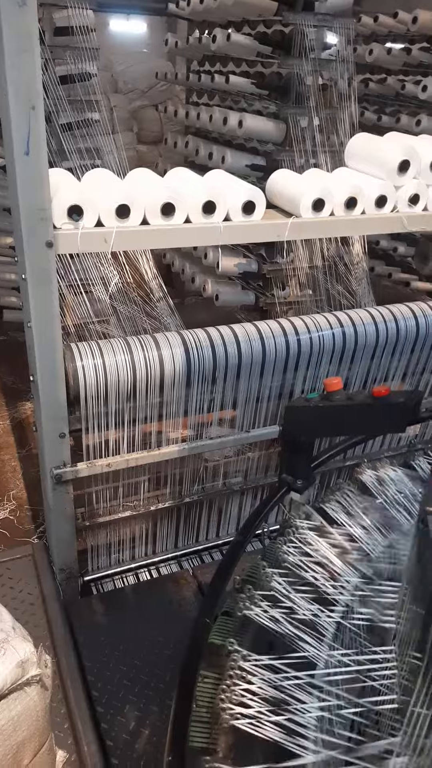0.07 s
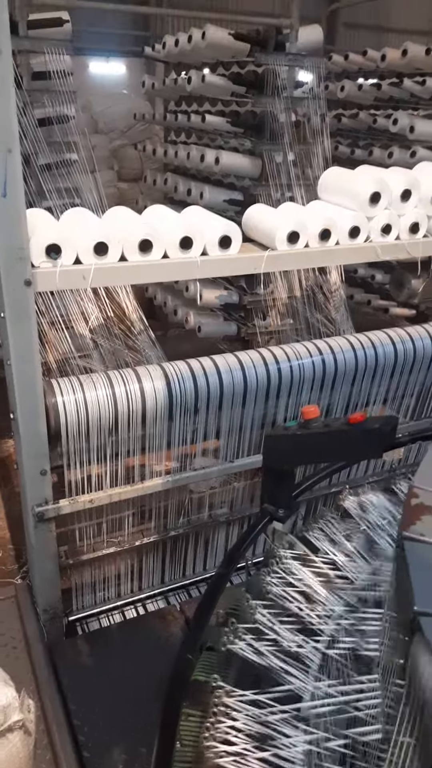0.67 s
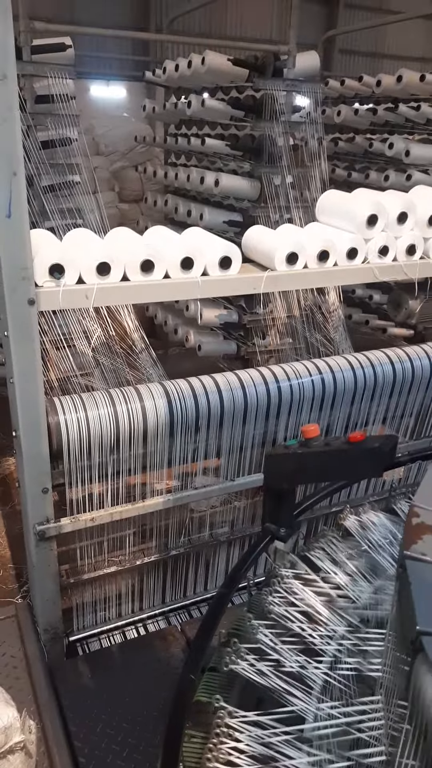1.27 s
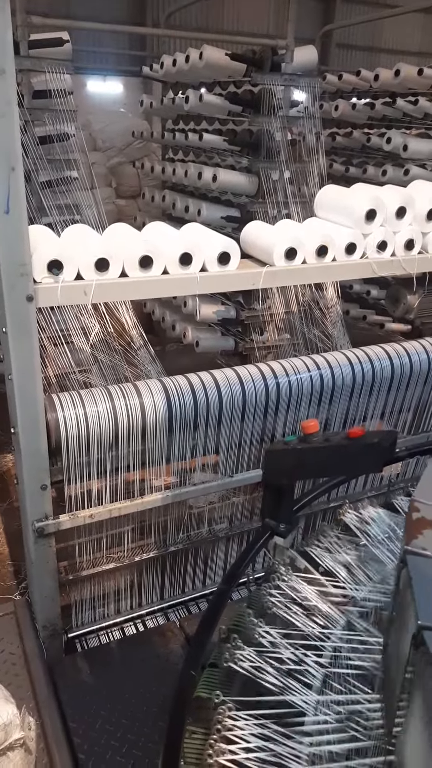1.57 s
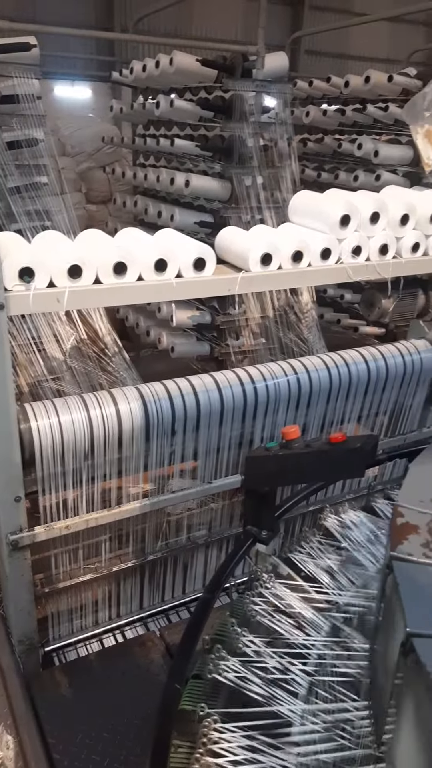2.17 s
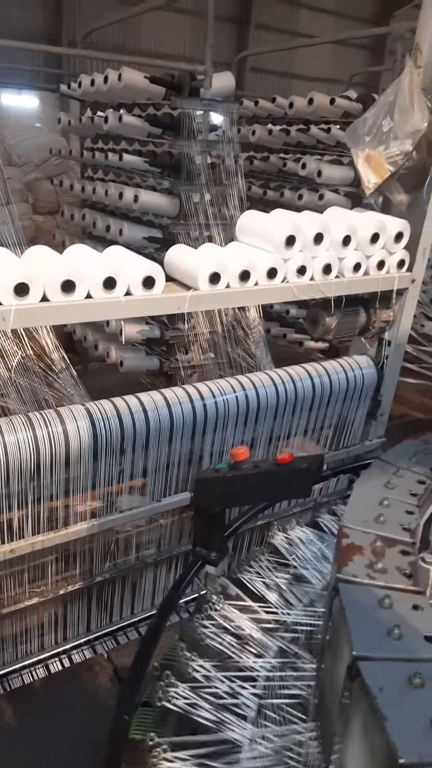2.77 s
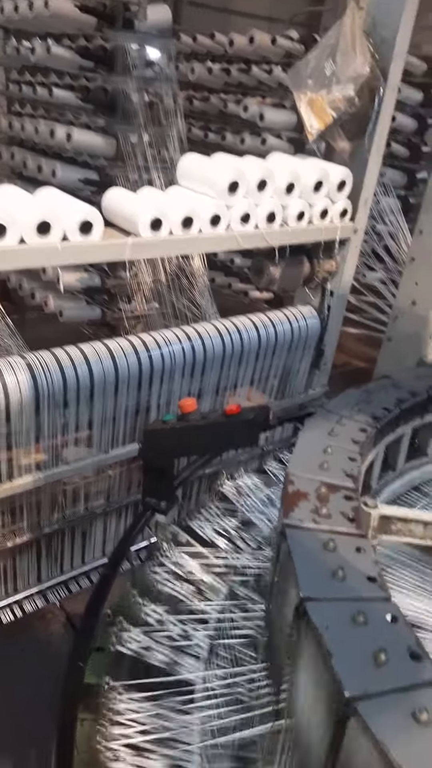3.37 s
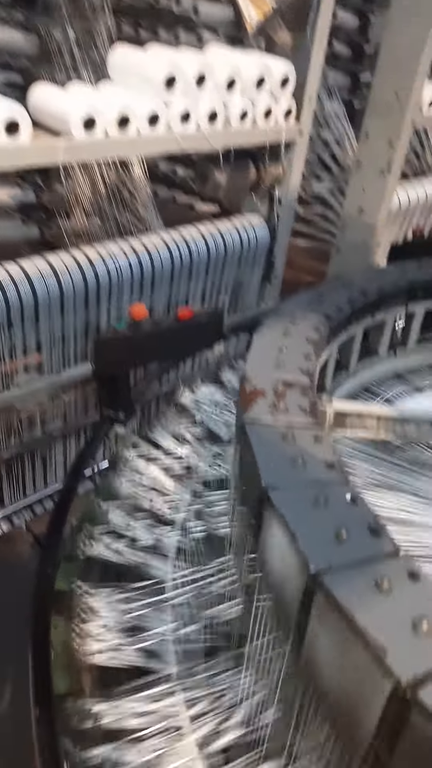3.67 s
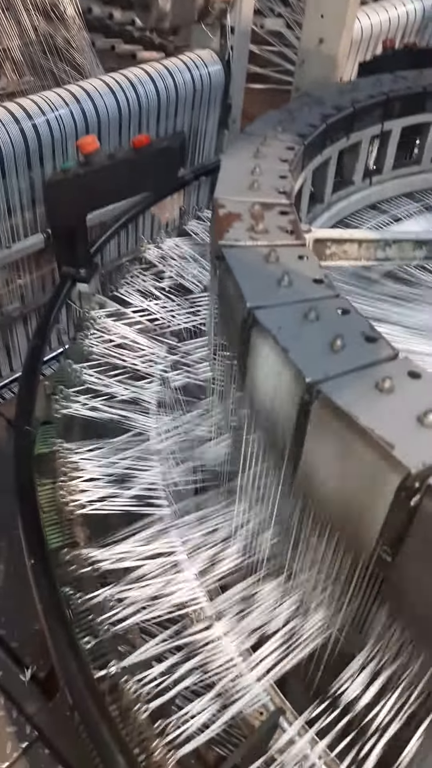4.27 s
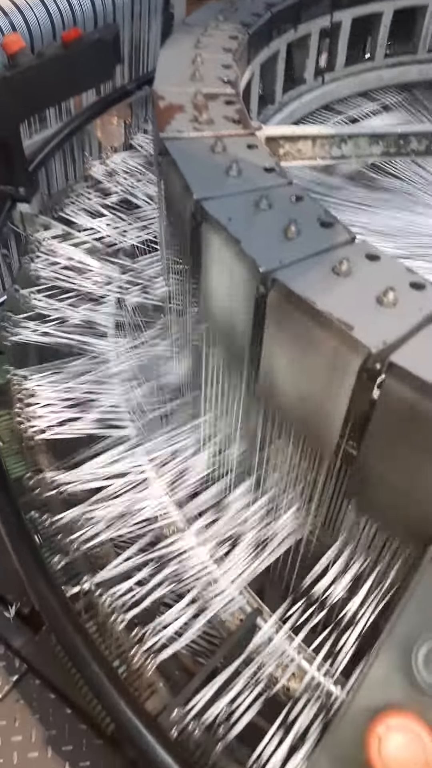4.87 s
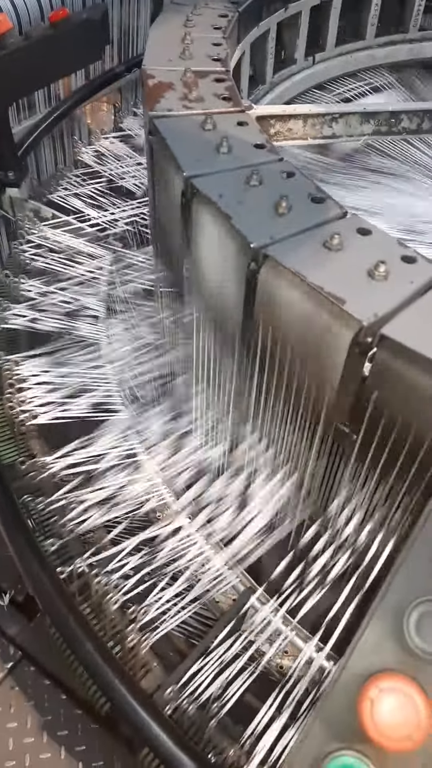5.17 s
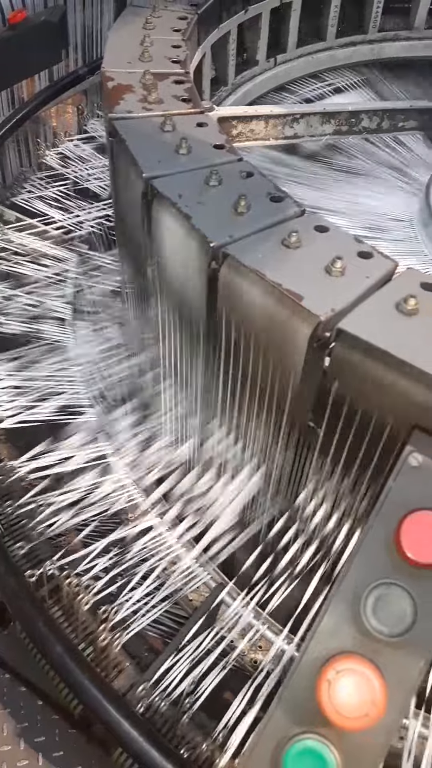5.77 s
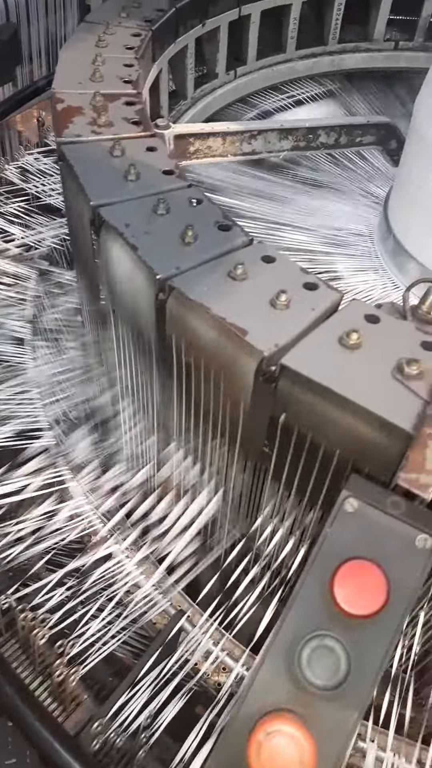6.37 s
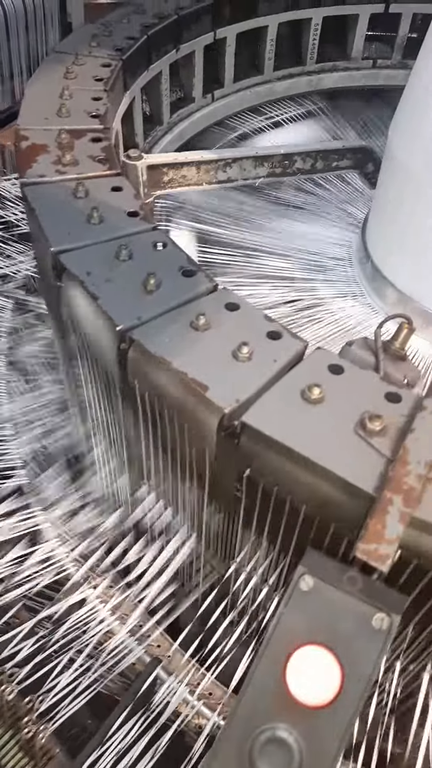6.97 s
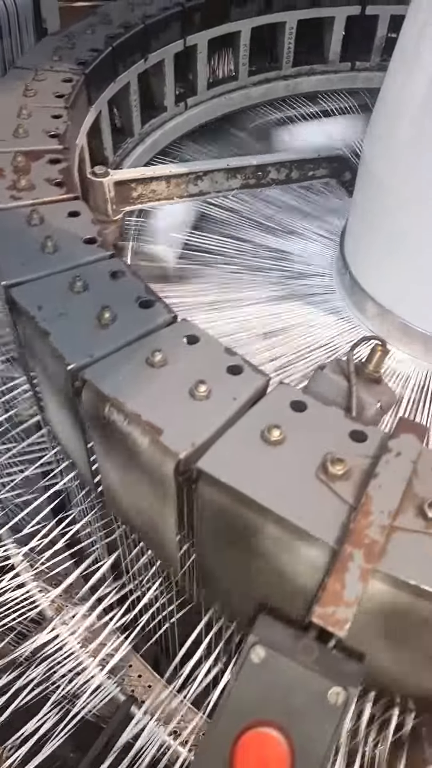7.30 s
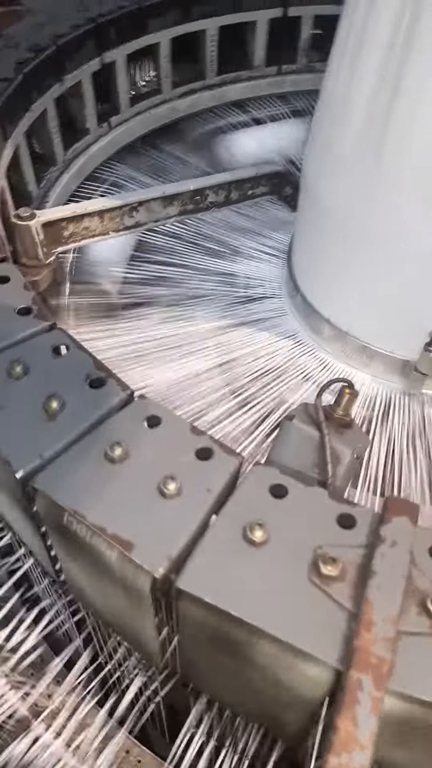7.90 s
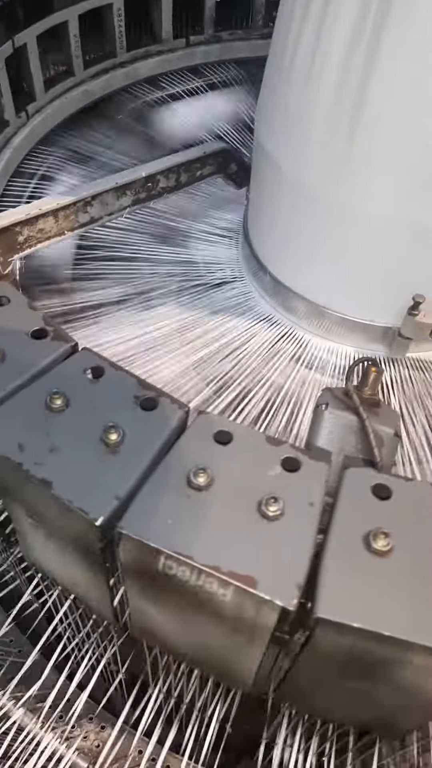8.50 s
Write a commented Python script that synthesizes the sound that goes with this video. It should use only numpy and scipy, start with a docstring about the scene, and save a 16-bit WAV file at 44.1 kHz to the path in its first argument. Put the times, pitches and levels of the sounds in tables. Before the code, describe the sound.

A circular loom runs close by from start to finish, about eight and a half seconds, at a steady, loud level. Hundreds of steel thread guides rattle so fast that they blur into a ringing roar. Through it, the shuttle wheels hold a high, rough whine that flutters and throbs with each turn. Plastic tapes add a bright, lightly pulsing hiss, and the frame gives a softer low hum and rumble. Other looms whine farther off at slightly different pitches in the hall's echo. Between about 3 and 5 seconds the microphone moves along the ring, and the whine and hiss shift slightly left. At about 3.8 seconds a wheel starts a short, high, rough squeak, repeating every 0.6 seconds. It is clearest around 4.4 seconds, then continues more faintly within the roar until the end.

```python
"""A circular loom in a weaving hall

Six shuttles race round a ring, their wheels whining over its thin bars; partway through, one
starts to squeak once a turn. A cam shakes the frame and throws the heddles (the steel thread
guides), which rattle while plastic tapes rustle. Much of this comes back with every turn.
The listener moves slowly along the ring, and other looms whine farther off."""
import sys
import numpy as np
from scipy import signal
from scipy.fft import rfft, irfft, next_fast_len
from scipy.io import wavfile
from scipy.ndimage import uniform_filter1d, minimum_filter1d, map_coordinates

SR = 44100
rng = np.random.default_rng(int(sys.argv[2]) if len(sys.argv) > 2 else 0)


def master_out(mix):
    """Clip the mix to full scale and print it as 16-bit PCM to the path in sys.argv[1]."""
    frames = np.transpose(np.atleast_2d(mix))
    ceiling = np.clip(frames, -1, 1)
    pcm = np.round(ceiling * 32767).astype(np.int16)
    wavfile.write(sys.argv[1], SR, pcm)


N = 376613

# How long the hall's echo takes to fade by 60 dB: pitch_hz, fade_s
HALL_ECHO = [(200, 4.4), (2000, 0.71), (10000, 0.33)]
# The whines of the other looms: pitch_hz, level_db, octave_level_db
FAR_LOOMS = [(1161, -25.5, -39), (1294, -28, -43.5), (905, -35, -58), (852, -39, -54)]
# The tones the cam shakes out of the frame: cycles_per_turn, level_db
FRAME_HUM = [ (36, -61), (54, -53), (57, -46), (63, -44), (69, -53), (72, -50), (81, -50), (96, -45),
             (99, -42), (108, -44), (114, -50), (127, -51), (144, -49), (159, -51), (174, -51), (184, -48),
             (216, -52), (243, -52)]
# The tone colour of the rumbling frame and floor: pitch_hz, relative_level_db
RUMBLE_COLOUR = [(15, -64), (25, -55), (59, -18), (91, -7), (129, -5.5), (161, -3), (232, -6.5), (293, -2),
                 (330, -4), (476, -4), (686, -6), (830, -6), (1080, -24), (1830, -120)]
# How alike the rumble is left and right (1 or more is the same, -1 opposite): pitch_hz, likeness
RUMBLE_LIKENESS = [(25, -1), (70, .92), (150, 1), (220, 1), (330, 0.9), (480, .6), (720, .5), (1000, 1.5)]
# How far the frame's sound on the left runs ahead of the right: pitch_hz, lead_radians
FRAME_LEFT_LEAD = [(40, .6), (120, 0.46), (260, 0.6), (330, .15), (900, .2)]
# How much louder the frame is on the left: pitch_hz, left_minus_right_db
FRAME_BALANCE = [(30, 1.5), (100, 3.5), (200, 0), (285, -3), (400, -1), (650, 1.5)]
# The tone colour of the tape rustle as heard, with the microphone's notch near 8.6 kHz:
# pitch_hz, relative_level_db
HEARD_RUSTLE = [(1850, -21.5), (3150, -2.5), (3260, -5), (3460, -5.5), (4070, -2), (5120, -1.5),
                (6890, -4.5), (7570, -9.5), (8610, -29.5), (9650, -19.5), (11700, -16.5), (15100, -21.5),
                (15800, -29.5)]
# Where the heddles, levers and ring resonate: pitch_hz, rough_half_width_hz, relative_level_db
STEEL_RESONANCES = [(989, 59, -2.5), (1063, 51, -10), (1170, 63, 0), (1314, 157, -5), (1562, 125, -9.5),
                    (1756, 170, -11), (1998, 103, -2.5), (2277, 275, -9), (2640, 500, -13.5),
                    (3030, 170, -14)]
# The listener's path (0 is beside the tape feed, 1 over the middle of the ring): time_s, place
LISTENER_PATH = [(3.0, 0.18), (5.0, 0.56), (8.5, 0.67)]

TURN_HZ, RING_BARS = 1.673, 614  # turns a second; bars a wheel crosses in one turn
# Each pair is (beside the feed, over the ring). SIDE means left minus right.
WHINE_DB, WHINE_SIDE_DB = (-19, -18), (0.5, 2.8)
OCTAVE_DB, OCTAVE_SIDE_DB = (-23, -23.5), (-5, -1.4)
CLATTER_DB, RUMBLE_DB = (-15, -16), (-27, -25.8)
RUSTLE_DB, FINE_RUSTLE_DB, RUSTLE_SIDE_DB = (-20, -20), (-33.9, -33), (-2, 0.8)


def amp(db):
    """Turn decibels into a gain to multiply by."""
    return 10 ** (np.asarray(db) / 20)


def unit(x):
    """Scale a signal to an average (rms) level of 1."""
    return x / np.sqrt(np.mean(x ** 2) + 1e-20)


def look_up(table, hz):
    """Read a table at any pitch, sliding between its rows."""
    pitches, values = np.transpose(table)
    return np.interp(np.log(hz + 1), np.log(pitches + 1), values)


def clock():
    """The time of each sample in seconds."""
    return np.arange(N) / SR


def on_path(pair):
    """Slide between two values as the listener moves."""
    times, places = np.transpose(LISTENER_PATH)
    return pair[0] + (pair[1] - pair[0]) * np.interp(clock(), times, places)


def pan(db):
    """Left and right gains that make the left louder by db."""
    return amp(np.array([db, -db]) / 2).reshape(2, -1)


def filtered(x, response):
    """Multiply each frequency in x by response(hz)."""
    size = next_fast_len(N + SR // 2)
    return irfft(rfft(x, size) * response(np.fft.rfftfreq(size, 1 / SR)), size)[..., :N]


def wobble(rate):
    """A smooth random curve through rate new values a second."""
    coarse = np.arange(0, N, 128)
    values = rng.standard_normal(int(N * rate / SR) + 4)
    return np.interp(np.arange(N), coarse, map_coordinates(values, [coarse * rate / SR]))


def swell(count, crest_s, depth_db):
    """A level in dB that rises and falls count times a turn."""
    return depth_db * np.cos(2 * np.pi * count * TURN_HZ * (clock() - crest_s))


def recurring(noise, share):
    """Make a share of the noise's power repeat every turn; the rest stays new."""
    one_turn = round(SR / TURN_HZ)
    loop = noise[:, ::-1][:, np.arange(N) % one_turn]
    return np.sqrt(share) * loop + np.sqrt(1 - share) * noise


def ticks(rate, spread_db):
    """Tiny knocks of uneven size, about rate a second on each side."""
    struck = rng.random((2, N)) < rate / SR
    return unit(struck * rng.standard_normal((2, N)) * amp(spread_db * rng.standard_normal((2, N))))


def ring_bumps(rate):
    """Random bumps on the ring, about rate a second, met again in every turn."""
    heights = rng.standard_normal(max(3, round(rate / TURN_HZ)))
    one_turn = signal.resample(heights - heights.mean(), round(SR / TURN_HZ))
    return np.resize(unit(one_turn), N)


def wheel_slip(rate, repeat_share=0.35):
    """A wheel slips partly at the same spots in each turn, partly by chance."""
    return np.sqrt(repeat_share) * ring_bumps(rate) + np.sqrt(1 - repeat_share) * wobble(rate)


def wheel_bounce(depth_db, rate):
    """A jumpy gain: bouncing wheels break their tone into short chirps."""
    return unit(amp(depth_db * np.tanh(wobble(rate))))


def hall(x):
    """The hall's echo alone, in which low notes last longest."""
    hz, t, spectrum = signal.stft(rng.standard_normal((2, SR)), SR, nperseg=256)
    fade = amp(-60 * t / look_up(HALL_ECHO, hz)[:, None])
    echo = signal.istft(spectrum * fade, SR, nperseg=256)[1]
    running = np.pad(np.atleast_2d(x), ((0, 0), (SR, 0)), mode="wrap")  # echoing from the start
    return unit(signal.fftconvolve(running, echo, axes=1)[:, SR:SR + N])


def echoing_wheels(hz, radius_m, slip, count=6):
    """Wheels drum a tone on the bars, heard as echo; its pitch swings as they come and go."""
    t = clock()
    tone = np.zeros(N)
    for shuttle in range(count):
        angle = 2 * np.pi * (TURN_HZ * t + shuttle / count)
        delay_s = radius_m * np.cos(angle) / 343  # sound travels 343 metres a second
        tone += np.sin(2 * np.pi * (hz * (t - delay_s) + rng.random()) + slip * wheel_slip(7))
    return hall(tone)


def far_looms():
    """Other looms whine, each at its own pitch, heard only through the hall's echo."""
    out = np.zeros((2, N))
    for hz, db, octave_db in FAR_LOOMS:
        out += amp(db) * echoing_wheels(hz, radius_m=0.42, slip=1.99, count=3)
        out += amp(octave_db) * echoing_wheels(2 * hz, radius_m=0.466, slip=1.7, count=2)
    return out * pan(1.3)


def frame(boom_hz=162, boom_width_hz=27, boom_db=-12.5):
    """The cam shakes the frame: a hum, a rumble and a boom where the frame resonates most."""
    angle = 2 * np.pi * TURN_HZ * clock() + 0.0029 * wobble(1.24)
    hum = sum(amp(db) * np.sqrt(2) * np.sin(cycles * angle + 2 * np.pi * rng.random())
              for cycles, db in FRAME_HUM)
    shake = recurring(rng.standard_normal((2, N)), share=0.23)
    spread = lambda hz: np.arccos(np.clip(look_up(RUMBLE_LIKENESS, hz), -1, 1)) / 2
    colour = lambda hz: amp(look_up(RUMBLE_COLOUR, hz)) * [np.cos(spread(hz)), np.sin(spread(hz))]
    middle, side = filtered(shake, colour)
    rumble = unit(np.array([middle + side, middle - side]))
    push = recurring(rng.standard_normal((1, N)), share=0.52)
    boom = unit(filtered(push, lambda hz: 1 / (1 + (2 * (hz - boom_hz) / boom_width_hz) ** 2)))
    sound = amp(on_path(RUMBLE_DB)) * (rumble + amp(boom_db) * boom) + hum
    left_lead = lambda hz: np.exp(0.5j * np.outer([1, -1], look_up(FRAME_LEFT_LEAD, hz)))
    return filtered(sound, lambda hz: pan(look_up(FRAME_BALANCE, hz)) * left_lead(hz))


def tapes(fine_above_hz=8600):
    """Plastic tapes rub and flick, swelling with the turn and as each shuttle parts them."""
    swell_db = (swell(count=1, crest_s=0.076, depth_db=0.5)
                + swell(count=2, crest_s=0.157, depth_db=0.5)
                + swell(count=6, crest_s=0.098, depth_db=0.84))
    rubbing = unit(ticks(rate=5000, spread_db=1.5) + 1.6 * rng.standard_normal((2, N)))
    rustle = filtered(rubbing, lambda hz: amp(look_up(HEARD_RUSTLE, hz)))
    fine = filtered(rustle, lambda hz: hz > fine_above_hz)
    body_db = on_path(RUSTLE_DB) + 0.22 * swell_db + 0.45 * wobble(28)
    body = unit(rustle - fine) * amp(body_db) * pan(on_path(RUSTLE_SIDE_DB))
    flicker_db = 0.6 * np.array([wobble(22), wobble(22)])
    return body + unit(fine) * amp(on_path(FINE_RUSTLE_DB) + swell_db + flicker_db)


def heddles():
    """Hundreds of steel thread guides and levers rattle, blurring into a ringing roar."""
    rattle = unit(ticks(rate=5000, spread_db=1.6) + 1.17 * rng.standard_normal((2, N)))
    blows = recurring(rattle, share=0.079)
    steel = lambda hz: np.sqrt(sum(amp(2 * db) / (1 + ((hz - pitch) / (0.97 * width)) ** 2) ** 2
                                   for pitch, width, db in STEEL_RESONANCES))
    return amp(on_path(CLATTER_DB)) * pan(-0.6) * unit(filtered(blows, steel))


def squeaks(first_s=3.793, closest_s=4.4, pitch_hz=3010, fall_hz_per_s=700):
    """One wheel skids at the same spot each turn: a short, rough chirp that sags in pitch."""
    out = np.zeros((2, N))
    for peak_s in np.arange(first_s, N / SR, 1 / TURN_HZ):
        db = -24 + 4.5 * np.exp(-((peak_s - closest_s) / 0.4) ** 2)  # loudest as the listener passes
        sounding = np.abs(clock() - peak_s) < 0.06
        t = clock()[sounding] - peak_s
        phase = 2 * np.pi * (pitch_hz * t - fall_hz_per_s * t ** 2 / 2)
        roughness = np.array([wobble(170)[sounding] for side in range(2)])
        loudness = amp(db) * np.exp(-(t / 0.023) ** 2)
        out[:, sounding] += loudness * np.sqrt(2) * np.sin(phase + 1.9 * roughness)
    return out


def nearest_wheel(hz, swing_hz, slip, count=6):
    """The tone that comes straight from the shuttles; its pitch sags as each goes by."""
    passing = 2 * np.pi * count * TURN_HZ * clock()
    phase = 2 * np.pi * hz * clock() - swing_hz / (count * TURN_HZ) * np.cos(passing)
    return unit(np.array([np.sin(phase + slip * wheel_slip(9)) for side in range(2)]))


def shuttles(third_db=-10.5):
    """The near loom's wheels whine over the bars: three tones that throb alike in every turn."""
    throb_db = (swell(count=3, crest_s=0.026, depth_db=1.0)
                + swell(count=6, crest_s=0.043, depth_db=0.6) + 0.5 * ring_bumps(rate=60))
    high_throb_db = (swell(count=1, crest_s=0.14, depth_db=0.6)
                     + swell(count=5, crest_s=0.11, depth_db=1.7) + 0.6 * ring_bumps(rate=50))
    bar_hz = RING_BARS * TURN_HZ
    # Slipping blurs the higher tones more.
    first = unit(echoing_wheels(bar_hz, radius_m=0.46, slip=0.99)
                 + 1.16 * nearest_wheel(bar_hz + 4, swing_hz=10.3, slip=1.67))
    octave = unit(echoing_wheels(2 * bar_hz, radius_m=0.48, slip=2.16)
                  + 0.69 * nearest_wheel(2 * bar_hz + 16, swing_hz=14.6, slip=2.14))
    third = unit(echoing_wheels(3 * bar_hz - 16, radius_m=0.302, slip=3.1)
                 + nearest_wheel(3 * bar_hz - 28, swing_hz=16, slip=2.34))
    low = amp(on_path(WHINE_DB) + throb_db) * pan(on_path(WHINE_SIDE_DB)) * first
    overtones = pan(on_path(OCTAVE_SIDE_DB)) * octave + amp(third_db) * third
    high = amp(on_path(OCTAVE_DB) + high_throb_db) * overtones
    return low * wheel_bounce(depth_db=2.4, rate=60) + high * wheel_bounce(depth_db=3.8, rate=125)


def scene():
    """The near loom with the rest of the hall behind it."""
    return shuttles() + squeaks() + heddles() + frame() + tapes() + far_looms()


def limiter(x, ceiling, samples=257):
    """Turn the sound down for a moment around each peak that would pass the ceiling."""
    needed = np.minimum(1, ceiling / (np.abs(x).max(axis=0) + 1e-9))
    return x * uniform_filter1d(minimum_filter1d(needed, samples), samples)


def record(dry):
    """Thin out the deepest bass, hold down the peaks and cut the highest treble."""
    low_hz, top_hz = 42, 15800
    heard = filtered(dry, lambda hz: hz ** 2 / np.sqrt(hz ** 4 + low_hz ** 4))
    held = limiter(heard, ceiling=0.98)
    return filtered(held, lambda hz: hz < top_hz)


dry = scene()
out = record(dry)
master_out(out)
```